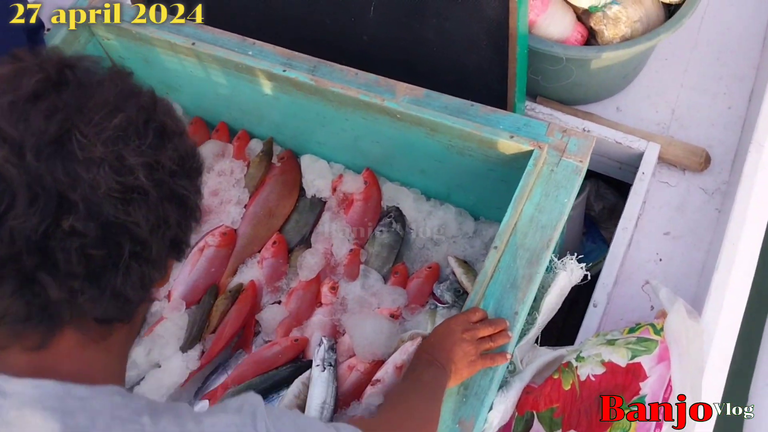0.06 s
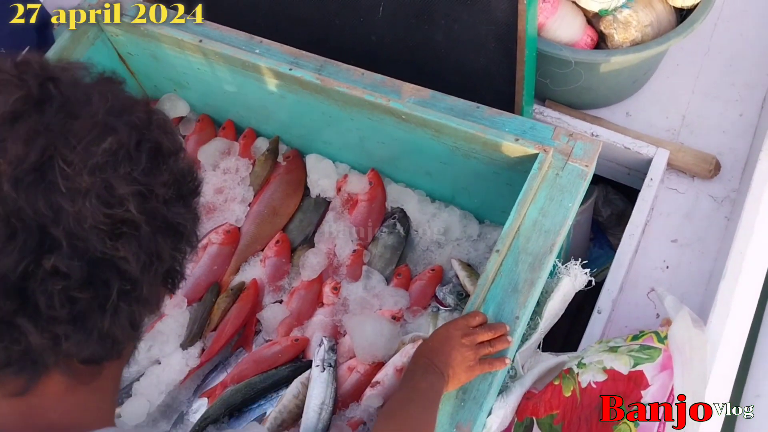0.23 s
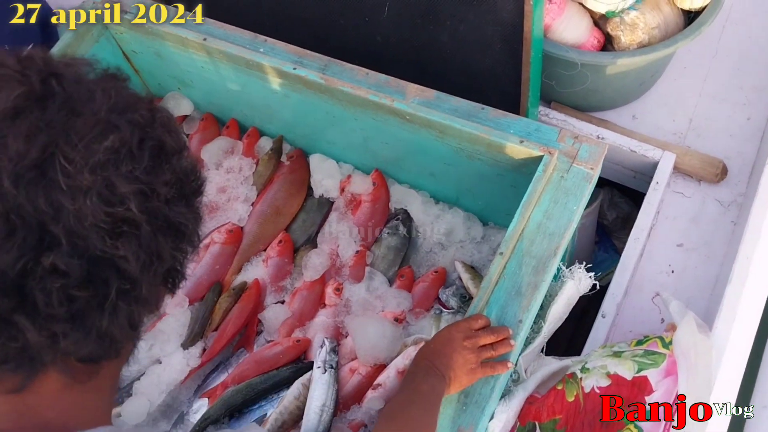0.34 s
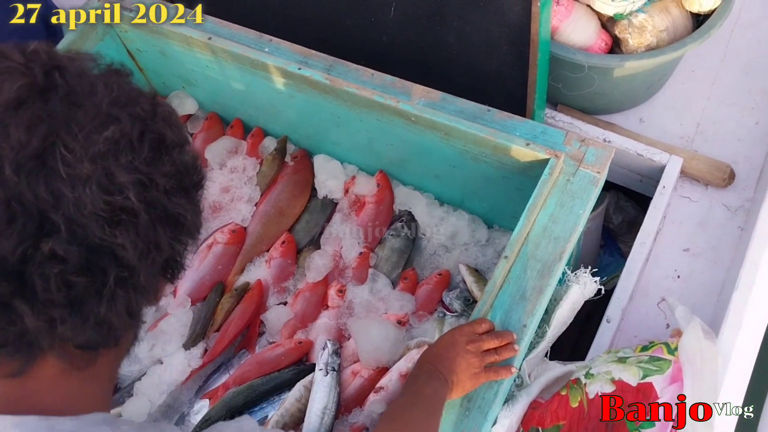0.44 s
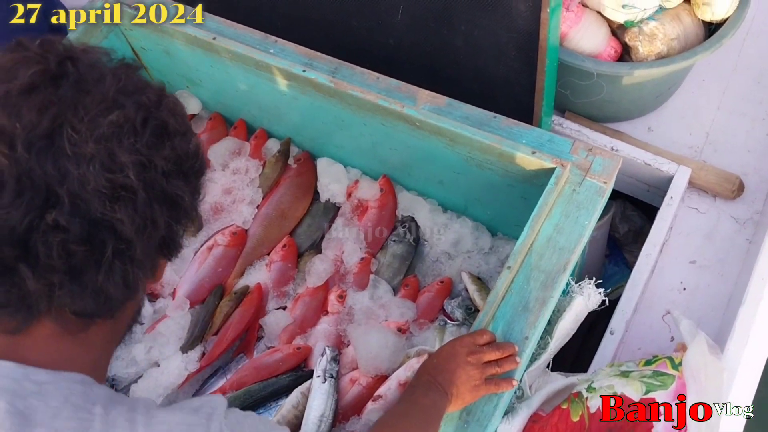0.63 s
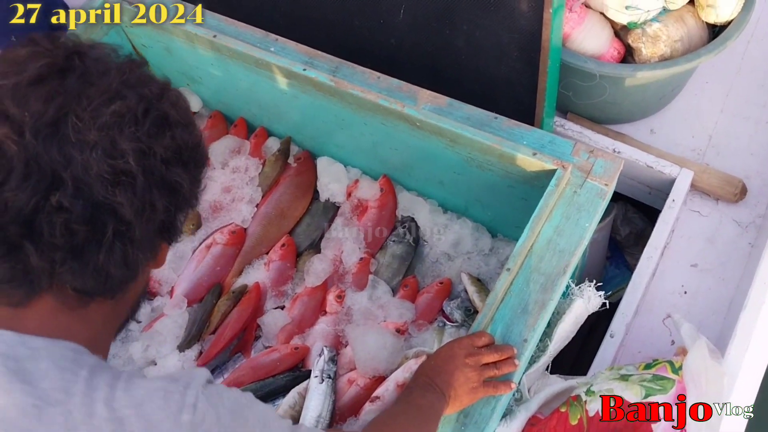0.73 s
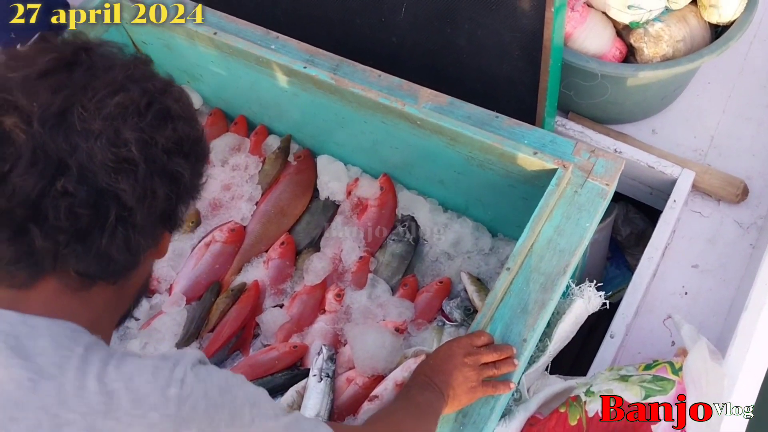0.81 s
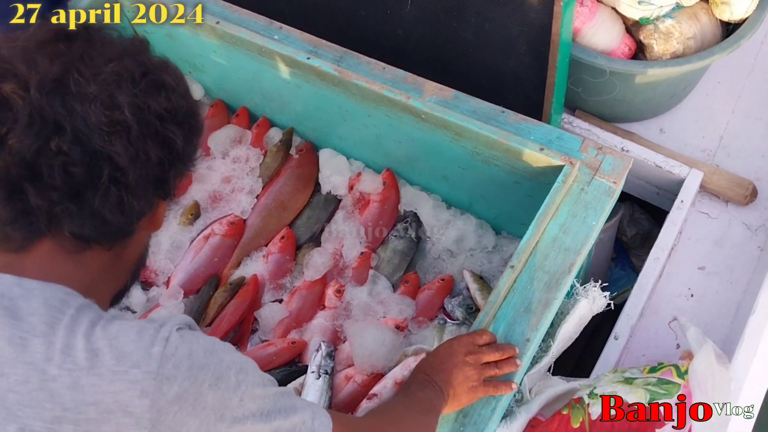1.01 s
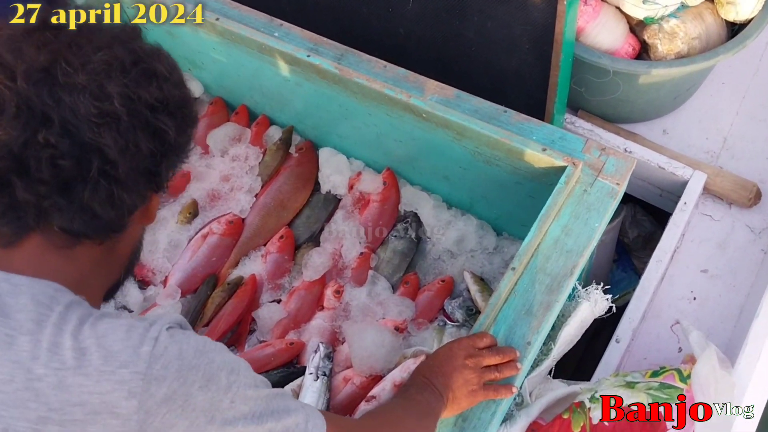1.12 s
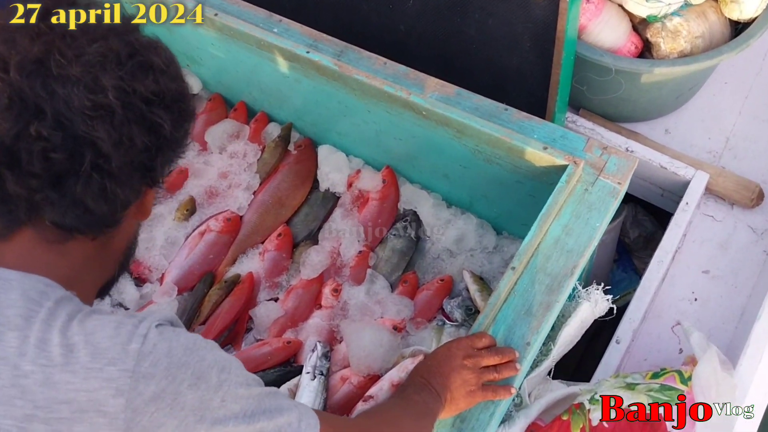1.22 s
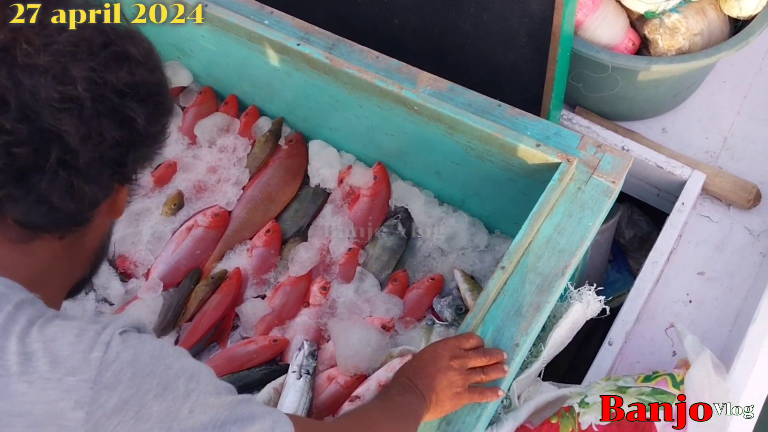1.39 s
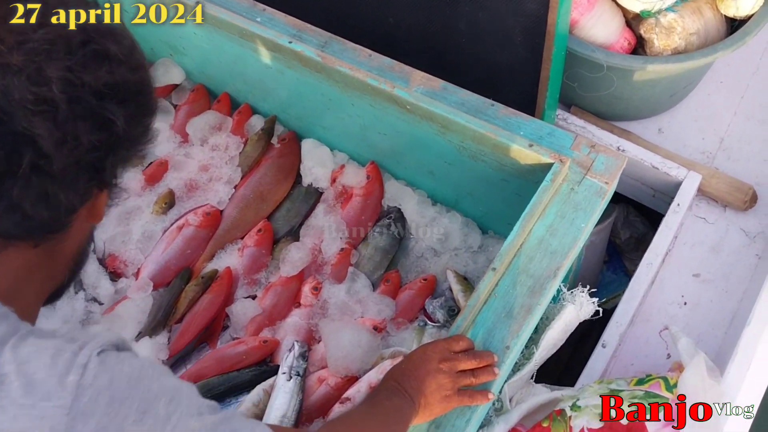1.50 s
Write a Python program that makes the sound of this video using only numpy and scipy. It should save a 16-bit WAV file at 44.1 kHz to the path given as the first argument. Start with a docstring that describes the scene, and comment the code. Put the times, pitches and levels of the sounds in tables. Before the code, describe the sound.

Fish and crushed ice shifted by hand in a wooden box: faint ticks, one sharp crunchy knock with a woody thud, then small icy rustles. Open boat, close stereo microphone buffeted by low wind.

```python
"""On a small open boat, a hand shifts fish and crushed ice in a wooden box.
Ice cracks are grainy noise bursts that also ring the chunk; thuds excite modes of the box.
Ice slides are swelling grains and tiny ringing snaps; a soft hiss is noise in narrow resonances.
Wind buffets two microphone ports as lumpy low noise and short ringing pushes.
Behind lie a far wash of sea and boat, shaped noise, and a low drone, noise in one resonance."""
import sys
import numpy as np
from scipy import signal
from scipy.fft import rfft, irfft
from scipy.io import wavfile

SR = 44100
rng = np.random.default_rng(int(sys.argv[2]) if len(sys.argv) > 2 else 0)


def ratio(d):
    """dB to gain"""
    e = np.asarray(d, float) / 20
    return 10 ** e


def store_wav(level_fs):
    """Save 16-bit WAV to argv[1]."""
    pcm = np.round(np.clip(np.atleast_2d(level_fs), -1, 1) * 32767)
    wavfile.write(sys.argv[1], SR, pcm.T.astype(np.int16))


N = 68355
RIGHT_LAG_S = .00014


def rms_one(x):
    """Scale to rms 1."""
    return x / np.sqrt(np.mean(x ** 2) + 1e-20)


def in_time(rows):
    """Columns of a curve, interpolated sample by sample."""
    s, *columns = np.transpose(rows)
    return [np.interp(np.arange(N) / SR, s, c) for c in columns]


def panned(left_minus_right_db):
    """Left and right gains for a level difference."""
    half_db = left_minus_right_db / 2
    return ratio(np.array([half_db, -half_db]).reshape(2, -1))


def drift(corner_hz, channels=1):
    """Slow random curve of rms 1: two-pole low-passed noise, computed every 20 samples."""
    r = np.exp(-2 * np.pi * corner_hz * 20 / SR)
    white = rng.standard_normal((channels, N // 20 + 2002))
    slow = signal.lfilter([1], [1, -2 * r, r * r], white)[:, 2000:]  # settled part
    return np.array([np.interp(np.arange(N) / 20, np.arange(len(v)), rms_one(v)) for v in slow])


def ring(clicks, hz, t60_s):
    """Two-pole resonator: a unit click starts a decaying sine of height 1."""
    r = ratio(-60 / (t60_s * SR))
    w = 2 * np.pi * hz / SR
    return signal.lfilter([0, np.sin(w)], [1, -2 * r * np.cos(w), r * r], clicks + 1e-18)


def soften(x, hz):
    """Double one-pole low-pass: a soft contact."""
    r = np.exp(-2 * np.pi * hz / SR)
    return signal.lfilter([(1 - r) ** 2], [1, -2 * r, r * r], x)


def colour(x, spectrum):
    """Minimum-phase filter through spectrum points; white noise keeps its rms."""
    hz, db = np.transpose(spectrum)
    grid_hz = np.maximum(np.fft.rfftfreq(8192, 1 / SR), 1)
    log_gain = np.interp(np.log(grid_hz), np.log(hz), db) * np.log(10) / 20
    # folding the cepstrum makes the phase minimal
    cepstrum = irfft(log_gain)
    cepstrum[1:4096] *= 2
    cepstrum[4097:] = 0
    impulse = irfft(np.exp(rfft(cepstrum)))
    impulse = impulse / np.sqrt(np.sum(impulse ** 2))
    return signal.fftconvolve(x, impulse[None], axes=1)[:, :x.shape[1]]


def pair(alike, grain_db=0, size=N, lag_s=RIGHT_LAG_S):
    """Stereo white noise with uneven grains, part common to both ports and late at the right; rms 1."""
    alike = np.clip(alike, 0, 1)
    white = rng.standard_normal((3, size))
    white = white * ratio(grain_db * rng.exponential(1, size).clip(0, 4))
    common = np.stack([white[0], np.roll(white[0], round(lag_s * SR))])
    return rms_one(np.sqrt(alike) * common + np.sqrt(1 - alike) * white[1:])


# Far wash spectrum. Each row: frequency in Hz, relative density in dB per Hz.
WASH_SPECTRUM = [(150, -14), (300, -1), (500, 0), (800, -4.5), (1200, -11), (2000, -16.5), (4000, -23),
                 (7000, -31.5), (9000, -45.5), (16000, -36)]
# Rise and fall of the wash. Each row: time in seconds, gain in dB.
WASH_SWELL = [(0, -2), (.2, 0.5), (.45, 0.5), (.75, 0.5), (1.0, 2.5), (1.25, 0), (1.55, 1)]
WASH_DB, WASH_ALIKE = -49.5, 0.41


def wash():
    """Far sea and boat: shaped noise that rises and falls a little."""
    swell_db, = in_time(WASH_SWELL)
    return ratio(WASH_DB + swell_db) * colour(pair(WASH_ALIKE), WASH_SPECTRUM)


HUM_HZ, HUM_WIDTH_HZ, HUM_DB = 74, 20, -47


def hum():
    """A wavering low drone, perhaps a motor through the hull: noise in one resonance."""
    drone = ring(rng.standard_normal(N), HUM_HZ, 2.2 / HUM_WIDTH_HZ)  # t60 = 2.2 / bandwidth
    return ratio(HUM_DB) * rms_one(drone)


# Wind on the ports. Each row: time in seconds, level in dB (played 4 dB higher), left minus right in dB.
GUSTS = [(0.0, -37.5, 11.5), (0.038, -45.5, -15), (0.064, -42, -2), (0.094, -47, -6), (0.116, -42, -2),
         (0.22, -32, 15.5), (0.314, -39.5, 13.5), (0.344, -37.5, 8.5), (0.378, -32, 7.5), (0.41, -34, 0.5),
         (0.594, -42.5, -2.5), (0.612, -33.5, 3), (0.69, -26, 1), (0.728, -34.5, 10.5), (0.79, -37, -6.5),
         (0.816, -35.5, -1.5), (0.866, -35, 5), (0.906, -31.5, -8), (0.94, -36, -2), (0.984, -39.5, -16),
         (1.048, -35, -2.5), (1.134, -38.5, -4.5), (1.152, -38.5, -6), (1.276, -40.5, 1),
         (1.312, -40, -19.5), (1.354, -35, -12), (1.39, -37, -7), (1.55, -42, -1)]
# Wind spectrum. Each row: frequency in Hz, relative density in dB per Hz.
WIND_SPECTRUM = [(22, -36.5), (50, 1.5), (80, 0), (150, -4.5), (240, -11), (350, -23), (500, -34),
                 (900, -69.5)]
WIND_ALIKE, WIND_LUMP_DB, WIND_LUMP_CORNER_HZ = .15, 3, 10


def wind():
    """Wind at the ports: lumpy low noise, mostly each port's own."""
    db, pan_db = in_time(GUSTS)
    lumps = ratio(WIND_LUMP_DB * drift(WIND_LUMP_CORNER_HZ, channels=2))
    rumble = rms_one(colour(pair(WIND_ALIKE) * lumps, WIND_SPECTRUM))
    return ratio(db + 4) * panned(pan_db) * rumble


# Single buffets on a port or soft knocks.
# Each row: start in seconds, click level in dB before softening, left minus right in dB, pitch in Hz.
BUFFETS = [(0.095, -21, 15.5, 170), (.219, -12.5, 16, 240), (.228, -7, 14, 146), (0.2374, -17.5, 27.5, 225),
           (0.2448, -19, 18, 201), (0.2545, -25, 20, 95), (0.2806, -21, 26.5, 277),
           (0.2904, -18.5, 23, 219), (.3005, -16.5, 21, 100), (.332, -16.5, 15.5, 140),
           (0.374, -35, 3, 200), (0.453, -13.5, -2, 176), (0.6307, -17, 20.5, 194), (0.7087, -10.5, 8, 115),
           (0.826, -18.5, 25.5, 186), (0.906, -22, -29, 153), (0.971, -24, -36, 90),
           (1.109, -17.5, -19.5, 148), (1.3155, -26, -5, 140), (1.3862, -11, -5, 213),
           (1.389, -18, -3, 540), (1.3918, -12, 1, 206), (1.451, -19, 2, 170)]
BUFFET_T60_CYCLES, BUFFET_CORNER_PER_PITCH = 2.36, 3.09


def buffets():
    """Each is a soft push: a click rings for a few cycles through four low-pass poles."""
    out = np.zeros((2, N))
    for s, db, pan_db, hz in BUFFETS:
        click = np.zeros(N)
        click[int(s * SR)] = ratio(db)
        push = ring(click, hz, BUFFET_T60_CYCLES / hz)
        corner_hz = BUFFET_CORNER_PER_PITCH * hz
        out += panned(pan_db) * soften(soften(push, corner_hz), corner_hz)
    return out


# Hiss resonances. Each row: centre in Hz, width of each of two passes in Hz, relative level in dB.
HISS_BANDS = [(3240, 1400, -3.5), (4010, 550, -2), (5100, 1000, -2), (7220, 890, -9)]
HISS_START_S, HISS_RISE_S, HISS_HOLD_S, HISS_FALL_S = 0.27, 0.036, 0.033, 0.22
HISS_DB, HISS_PAN_DB = -58, 3.5


def hiss():
    """Noise in a few narrow resonances that swells and fades."""
    white, out = pair(.3), 0
    for hz, width_hz, db in HISS_BANDS:
        t60_s = 2.2 / width_hz
        out = out + ratio(db) * rms_one(ring(ring(white, hz, t60_s), hz, t60_s))
    times_s = HISS_START_S + np.cumsum([0, HISS_RISE_S, HISS_HOLD_S, HISS_FALL_S])
    swell = np.interp(np.arange(N) / SR, times_s, [0, 1, 1, 0])
    return ratio(HISS_DB) * panned(HISS_PAN_DB) * swell * out


CRACKLE_PER_S, CRACKLE_T60_CYCLES = 400, 14


def crackle():
    """Tiny snaps at random, each ringing a few cycles at one of 14 pitches; rms 1."""
    sizes = ratio(2.5 * rng.exponential(1, N).clip(0, 4))
    snaps = sizes * (rng.random(N) < CRACKLE_PER_S / SR)
    dealt = rng.integers(0, 14, N)
    side = panned(rng.normal(0, 4, N))
    out = 0
    for k, hz in enumerate(np.geomspace(1200, 7000, 14)):
        out = out + ring(snaps * side * (dealt == k), hz, CRACKLE_T60_CYCLES / hz)
    return rms_one(out)


# Ice slides. Each row: start in seconds, grain level in dB, rise in seconds, hold in seconds,
# fade t60 in seconds.
SLIDES = [(0.283, -64.5, 0.041, 0.17, .6), (.7, -64.5, .02, 0.091, .3), (0.831, -48, 0.028, 0.023, 0.46),
          (0.927, -59, .02, 0.025, 0.43), (1.02, -54.5, 0.018, 0.014, 0.25),
          (1.087, -58.5, 0.01, 0.0075, .2), (1.153, -52.5, 0.038, 0.02, 0.33),
          (1.275, -49, 0.054, 0.075, 0.16), (1.422, -51.5, 0.03, 0.11, .3)]
# Sliding ice spectrum. Each row: frequency in Hz, relative density in dB per Hz.
ICE_SPECTRUM = [(530, -25), (900, -7), (1090, -7), (1190, -2.5), (1550, -3.5), (2600, -6.5), (3040, -7.5),
                (5350, -9.5), (8450, -17.5), (12400, -11.5), (16000, -21)]
RUSTLE_GRAIN_DB, RUSTLE_ALIKE, RUSTLE_REST_DB = 3.5, 0.17, -72
RUSTLE_PATCH_DB, RUSTLE_PATCH_CORNER_HZ, RUSTLE_PAN_DB = 1, 40, -1.5
CRACKLE_DB = -9  # relative to the grains


def rustle():
    """Dense grains and snaps of sliding ice; each slide swells, holds and fades."""
    t = np.arange(N) / SR
    power = ratio(2 * RUSTLE_REST_DB)
    for s, db, rise_s, hold_s, t60_s in SLIDES:
        rise = np.clip((t - s) / rise_s, 0, 1)
        fade_db = -60 * np.maximum(t - s - rise_s - hold_s, 0) / t60_s
        power = power + (rise * ratio(db + fade_db)) ** 2
    grains = pair(RUSTLE_ALIKE, RUSTLE_GRAIN_DB)
    patchy = grains * ratio(RUSTLE_PATCH_DB * drift(RUSTLE_PATCH_CORNER_HZ))
    ice = colour(patchy, ICE_SPECTRUM) + ratio(CRACKLE_DB) * crackle()
    return np.sqrt(power) * panned(RUSTLE_PAN_DB) * ice


# The blow and its bounces. Each row: start in seconds, click level in dB before softening.
THUDS = [(0.6648, -10), (0.6741, -16.5), (0.6777, -15)]
# Modes of the wooden box. Each row: frequency in Hz, gain in dB, t60 in seconds.
BOX_MODES = [(79, -0.5, 0.079), (170, -1, 0.034), (262, -3.5, 0.054), (359, -13.5, 0.061),
             (390, -21.5, 0.015), (530, -11.5, 0.016), (762, -15.5, 0.037), (1035, -18.5, 0.034),
             (1550, -10, .025), (1905, -15, 0.021)]
THUD_CORNER_HZ = 900


def box():
    """A soft blow and its bounces into the modes of the wooden box."""
    click = np.zeros(N)
    for s, db in THUDS:
        click[int(s * SR)] = ratio(db)
    blow = soften(click, THUD_CORNER_HZ)
    return sum(ratio(db) * ring(blow, hz, t60_s) for hz, db, t60_s in BOX_MODES)


# Ice cracks, and one low soft knock at 1.256 s played the same way. Each row: start in seconds, level in dB
# (played 8 dB lower), t60 in seconds, treble tilt in dB per octave, pitch of the chunk (or of the knock) in Hz.
CRACKS = [(0.449, -39.5, 0.12, 0, 2020), (0.4796, -34, 0.032, 7, 4700), (.5591, -41.5, 0.028, 14, 9000),
          (.607, -50, 0.026, 16, 10900), (0.6203, -15.5, 0.025, 0, 4400), (.6225, -26.5, 0.094, -2.5, 1390),
          (.629, -29.5, 0.083, -7, 2490), (0.6579, -18, 0.035, 6.5, 6450), (.6598, -13.5, 0.023, 5.5, 3000),
          (.6625, -18.5, 0.061, -11, 2430), (.667, -28.5, 0.064, -2, 900), (0.6763, -22, 0.041, -2.5, 1480),
          (.6875, -29.5, 0.072, -1, 2720), (0.694, -28.5, 0.051, -4, 1780), (.700, -33, 0.13, -9, 1020),
          (.708, -42.5, 0.048, 0, 2400), (.718, -32.5, 0.05, -5.5, 1850), (0.8664, -37, 0.069, 3, 3540),
          (0.875, -47, 0.23, 4, 2840), (1.0146, -39, 0.041, -4, 2310), (1.103, -48, 0.046, -9, 4030),
          (1.163, -48, 0.045, 3.5, 5070), (1.256, -58, .03, -1, 580), (1.388, -48, 0.055, 14, 2650),
          (1.4616, -45, 0.061, -17, 4500), (1.492, -40, 0.11, -7.5, 4360)]
# Crack spectrum before tilt. Each row: frequency in Hz, relative density in dB per Hz.
CRACK_SPECTRUM = [(300, -11), (850, -6), (1400, -7.5), (2200, -8.5), (2900, -7), (4300, -9), (5800, -13),
                  (8000, -15.5), (12600, -15.5), (16000, -24)]
CRACK_RISE_S, CRACK_GRAIN_DB, CRACK_ALIKE = 0.00019, 7, 0.2
CRACK_PAN_DB, CRACK_LAG_S = 2.5, .00039
CHUNK_DB, CHUNK_T60_CYCLES = 3.5, 5


def cracks():
    """Grainy bursts that start at once and die; each also rings the chunk that broke."""
    out = np.zeros((2, N + SR))
    t = np.arange(SR // 5) / SR
    for s, db, t60_s, tilt_db, chunk_hz in CRACKS:
        shape = (1 - np.exp(-t / CRACK_RISE_S)) * ratio(db - 8 - 60 * t / t60_s)
        tilted = [(hz, v + tilt_db * np.log2(hz / 4000)) for hz, v in CRACK_SPECTRUM]
        burst = shape * pair(CRACK_ALIKE, CRACK_GRAIN_DB, size=len(t), lag_s=CRACK_LAG_S)
        chunk = ring(burst, chunk_hz, CHUNK_T60_CYCLES / chunk_hz) * np.sqrt(chunk_hz / SR)
        crack = colour(burst, tilted) + ratio(CHUNK_DB) * chunk
        i = int(s * SR)
        out[:, i:i + len(t)] += panned(CRACK_PAN_DB) * crack
    return out[:, :N]


def scene():
    """All sources at the two ports."""
    return wind() + buffets() + box() + cracks() + rustle() + hiss() + wash() + hum()


def roll_off(x):
    """The treble ends steeply here."""
    return signal.sosfilt(signal.butter(12, 16660, fs=SR, output="sos"), x)


def record(dry):
    """Cuts the bass below 50 Hz and the top from 16.3 kHz (40 dB down)."""
    low_cut = signal.butter(3, 50, "high", fs=SR, output="sos")
    top_cut = signal.cheby2(12, 40, 16300, fs=SR, output="sos")
    mix = signal.sosfilt(top_cut, signal.sosfilt(low_cut, dry))
    return roll_off(mix)


dry = scene()
out = record(dry)
store_wav(out)
```